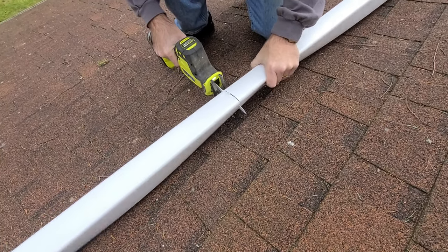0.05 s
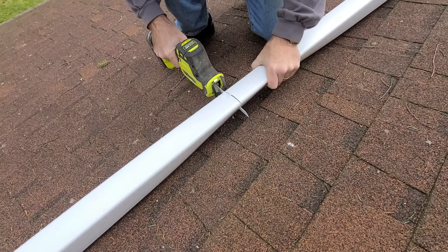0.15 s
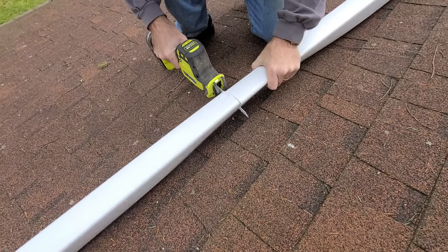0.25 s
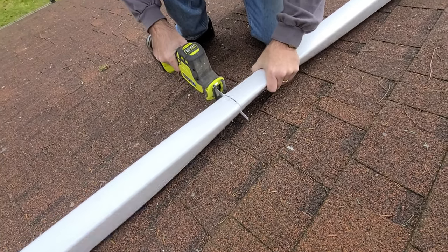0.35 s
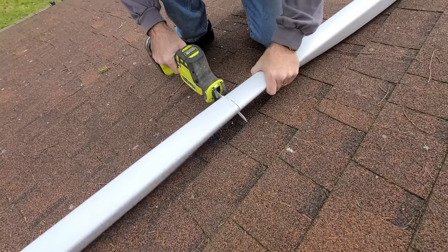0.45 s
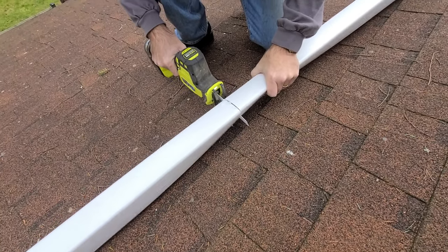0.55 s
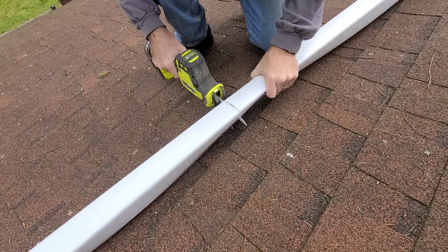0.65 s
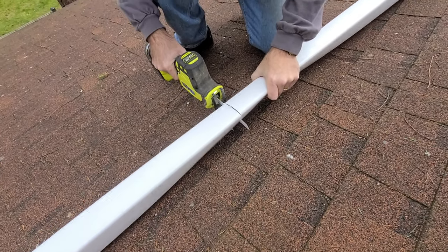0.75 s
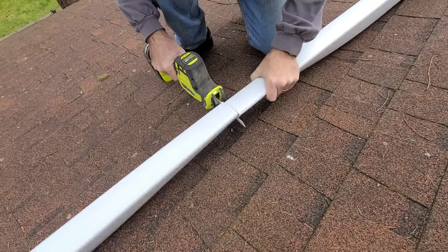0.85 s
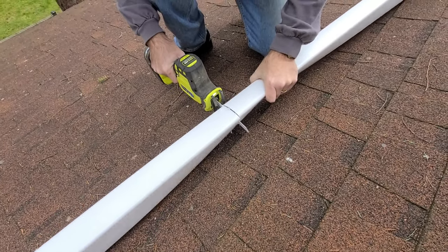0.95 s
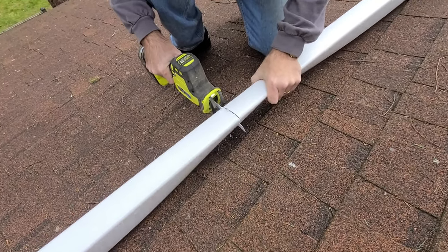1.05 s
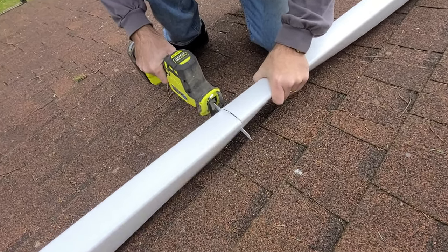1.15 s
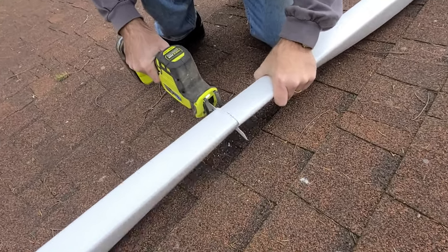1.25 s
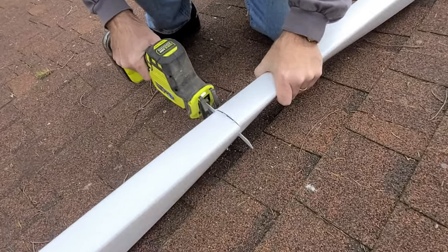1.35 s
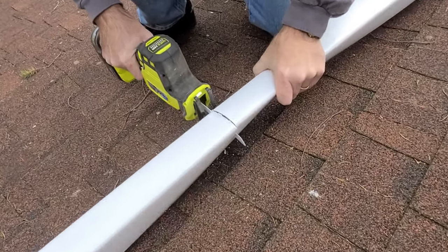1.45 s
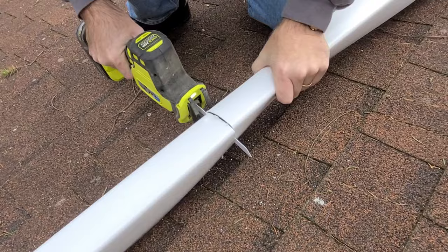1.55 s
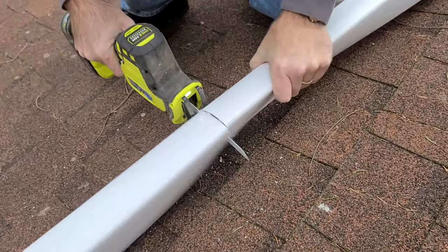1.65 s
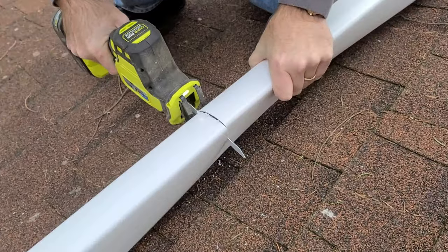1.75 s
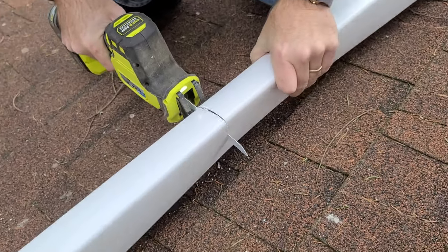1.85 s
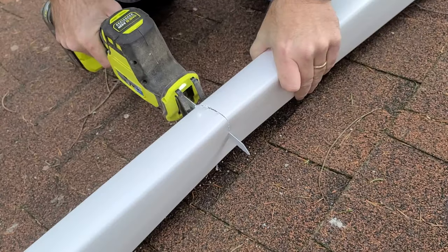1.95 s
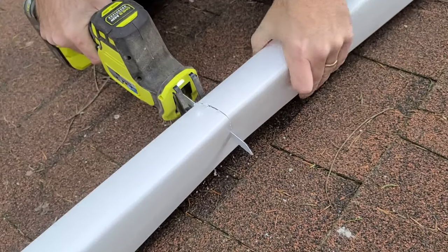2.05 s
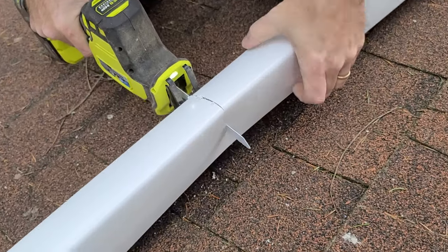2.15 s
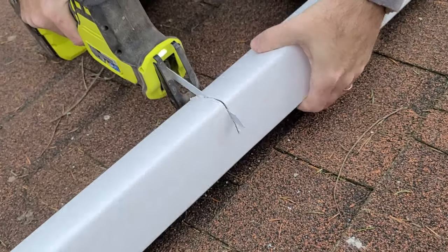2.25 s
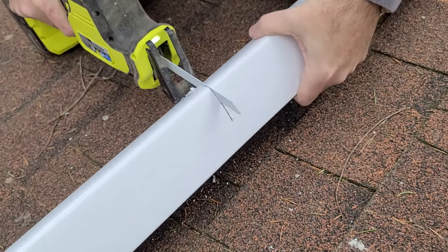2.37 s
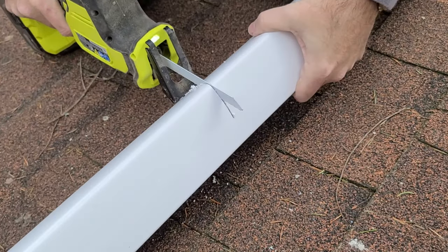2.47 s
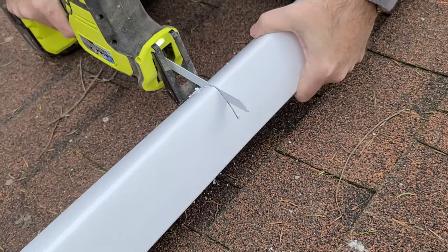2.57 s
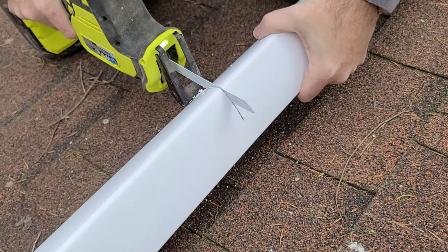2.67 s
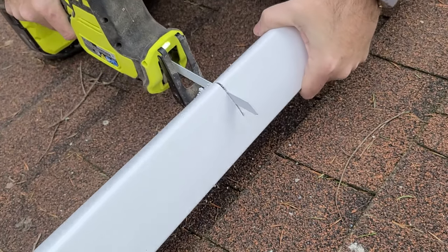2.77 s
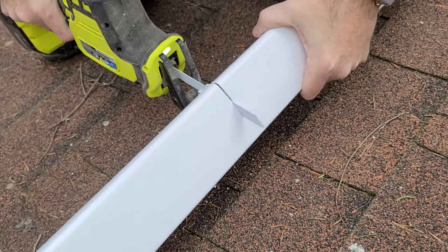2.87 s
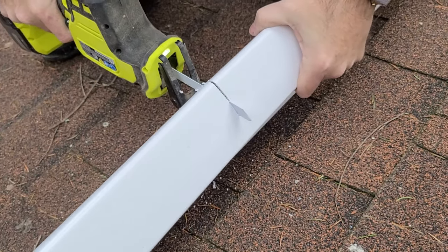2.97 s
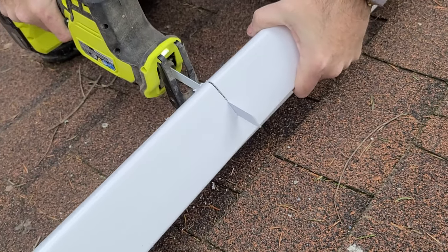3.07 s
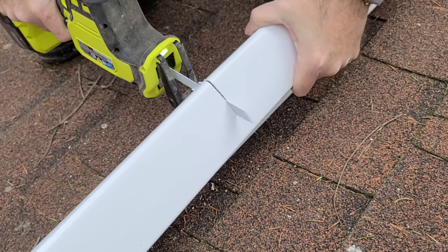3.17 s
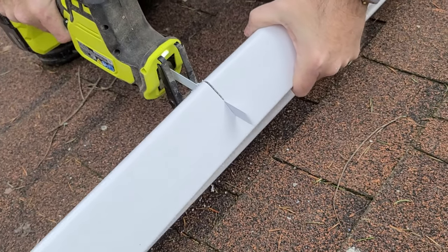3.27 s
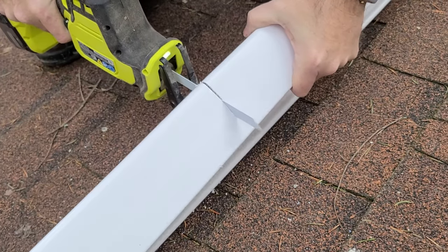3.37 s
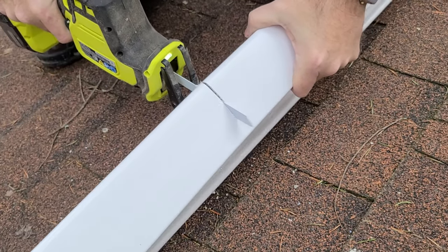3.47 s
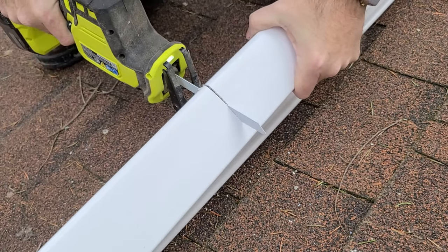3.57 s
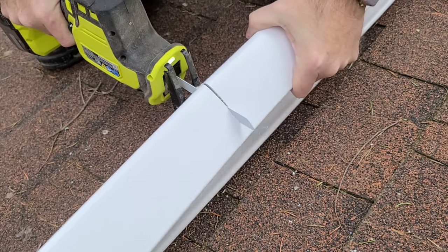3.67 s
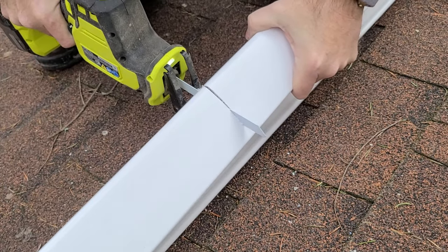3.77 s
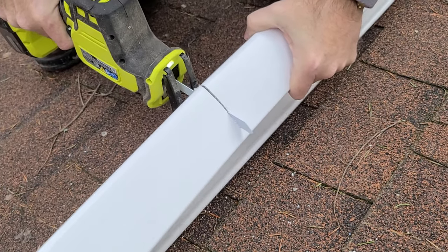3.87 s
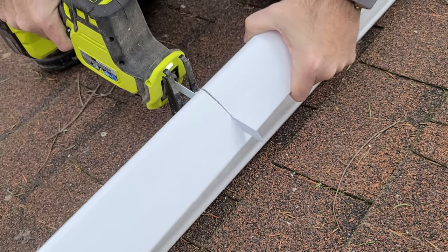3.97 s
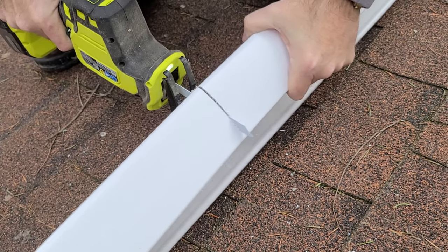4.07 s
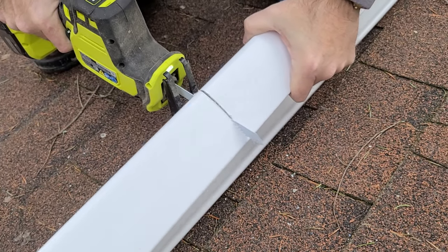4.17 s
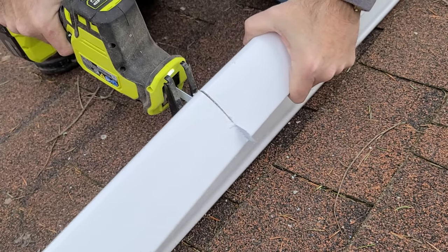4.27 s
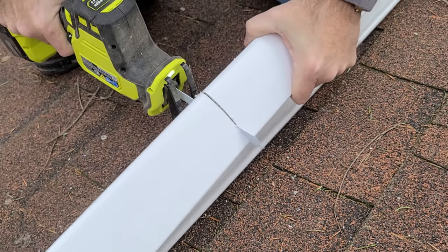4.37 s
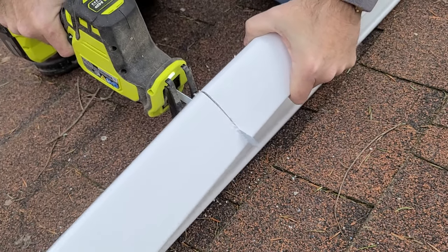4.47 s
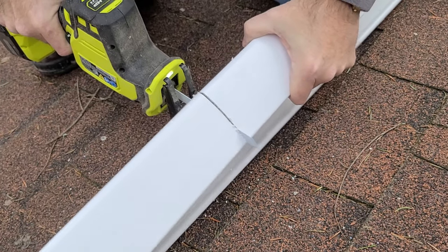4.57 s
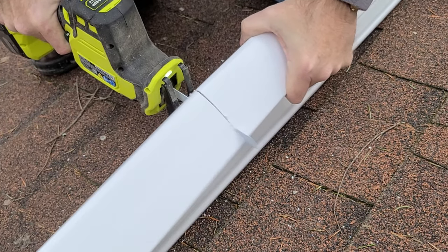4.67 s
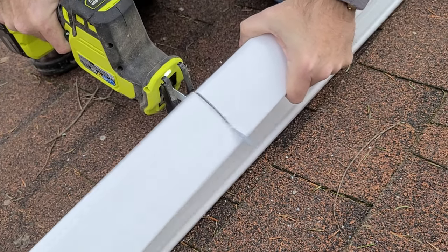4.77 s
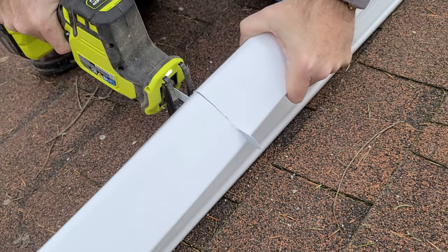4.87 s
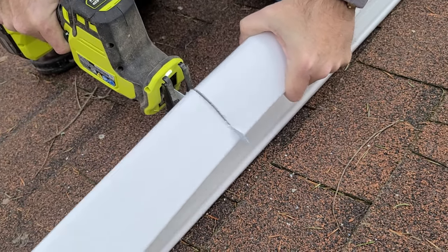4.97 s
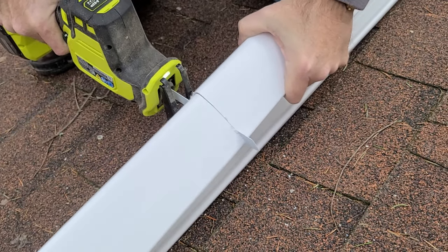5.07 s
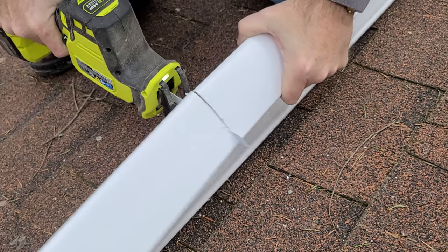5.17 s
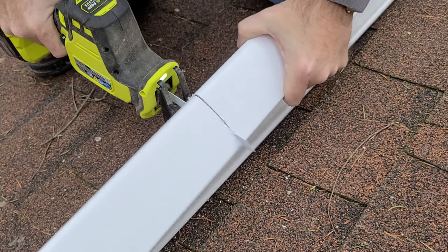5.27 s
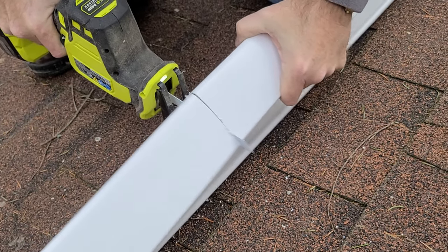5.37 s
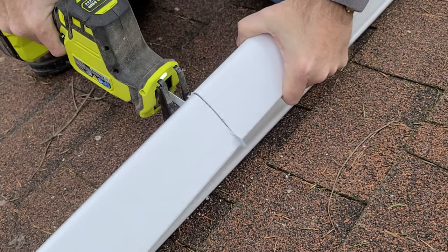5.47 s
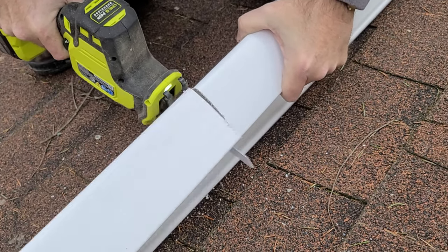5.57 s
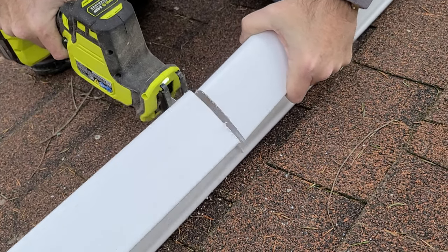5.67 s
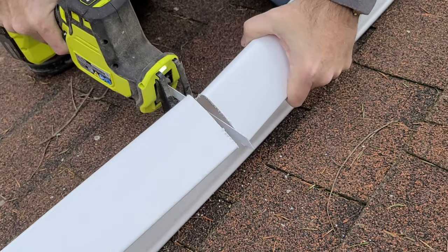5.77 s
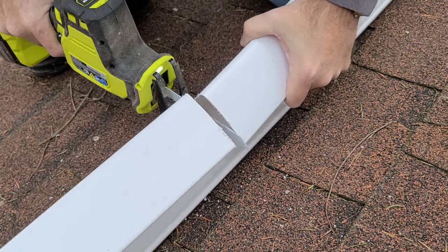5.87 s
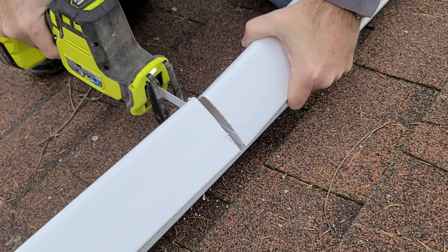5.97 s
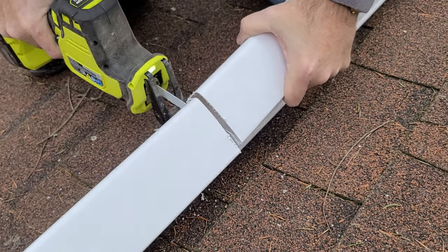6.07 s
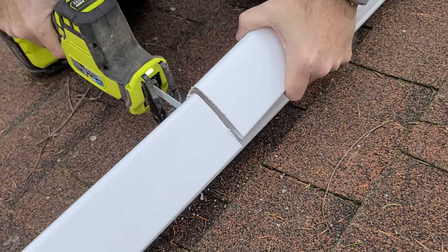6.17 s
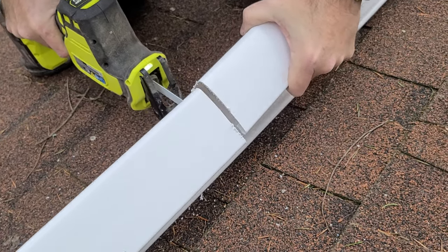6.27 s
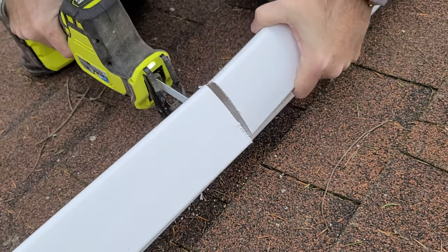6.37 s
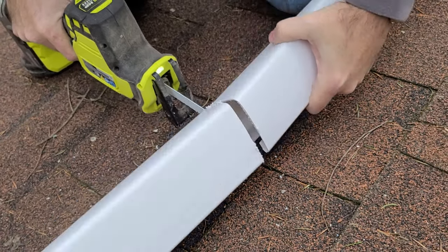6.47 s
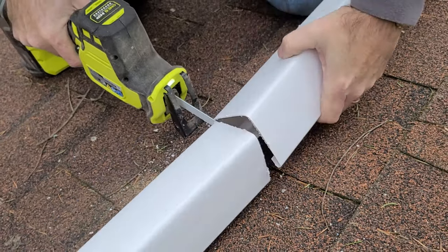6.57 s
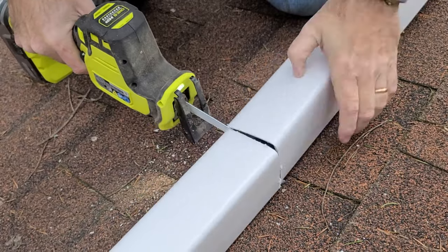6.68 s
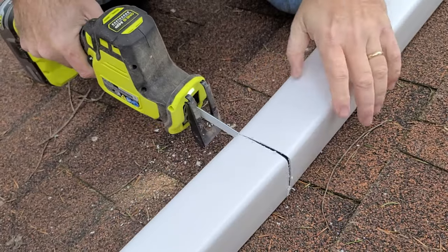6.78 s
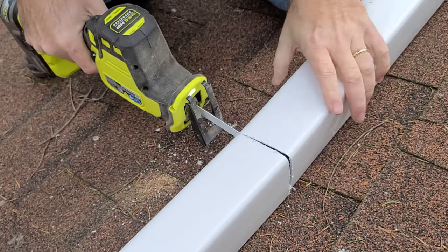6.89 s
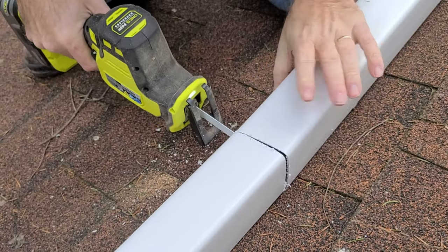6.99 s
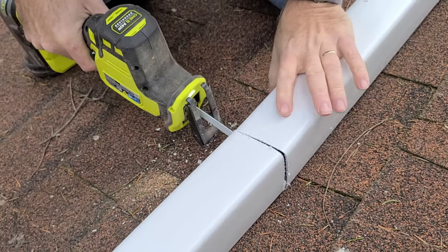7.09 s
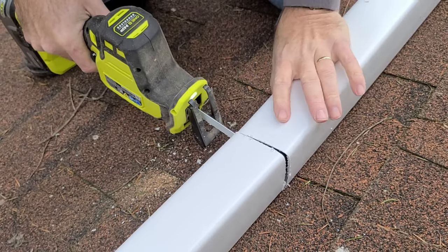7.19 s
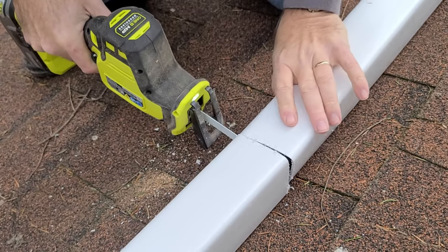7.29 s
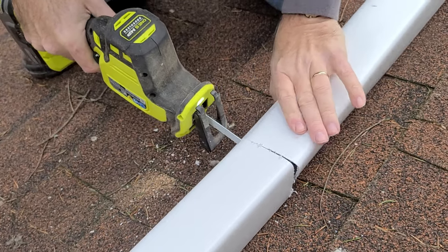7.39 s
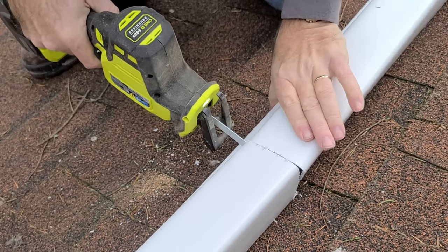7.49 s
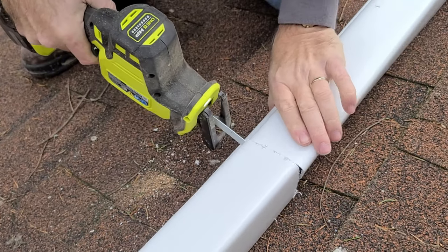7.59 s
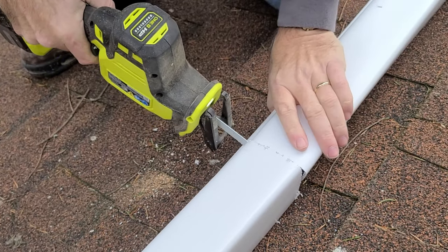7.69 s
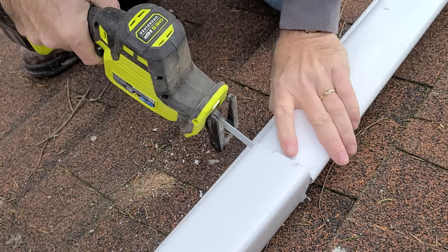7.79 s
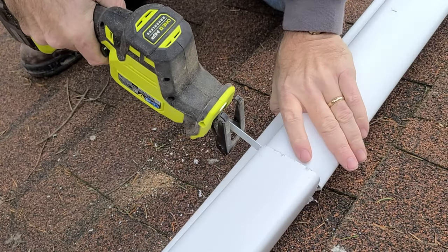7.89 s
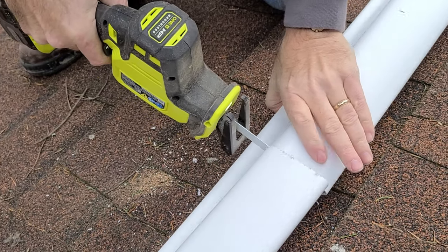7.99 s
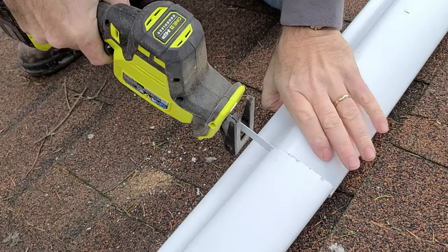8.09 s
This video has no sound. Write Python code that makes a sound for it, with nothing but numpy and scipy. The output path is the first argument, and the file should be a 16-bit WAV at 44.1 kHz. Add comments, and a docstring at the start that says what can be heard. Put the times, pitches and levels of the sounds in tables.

```python
"""A saw buzzes and whirrs in two bursts; between and after them plastic knocks and scrapes on grit.
A cordless reciprocating saw cuts a plastic gutter lying on a shingle roof. At first the gutter chatters
loosely; turned over and held tight it buzzes with the strokes, then gains play again until it parts.
Saw teeth, blows and grit are shaped noise and clicks that ring the modes of the plastic; the shaking
is a stack of wavering sines. Faint outdoor noise lies underneath, and a short echo hollows everything."""
import sys
import numpy as np
from scipy import signal
from scipy.fft import rfft, irfft, next_fast_len
from scipy.io import wavfile
from scipy.ndimage import map_coordinates

SR = 44100
rng = np.random.default_rng(int(sys.argv[2]) if len(sys.argv) > 2 else 0)


def materialize(psi):
    """Save the field psi as 16-bit PCM at rate SR to the path in sys.argv[1].

    A 1-D psi becomes a single channel; in a 2-D psi each row is a channel.
    """
    bounded = np.clip(np.atleast_2d(psi).T, -1, 1)
    quanta = np.round(bounded * 32767).astype(np.int16)
    wavfile.write(sys.argv[1], SR, quanta)


N = 358974

# All table levels are relative: the functions add their own trims.
# Outdoor background spectrum. Each row: frequency in Hz, density in dB per Hz.
AIR_SPECTRUM = [(20, -25), (50, -12), (160, 4), (800, -19.5), (4500, -27), (8000, -96), (15000, -66)]
# Spells of low rumble from wind and handling. Each row: start in seconds, end in seconds, level in dB.
RUMBLE_SPELLS = [(0, 2.55, -57.5), (3.45, 5.75, -52), (6.78, 8.14, -54)]
# The gutter is dragged over the shingles.
# Each row: start in seconds, length in seconds, wall level in dB, grit level in dB.
DRAGS_ON_SHINGLES = [(1.85, .34, -58, -71), (2.045, .035, -57, -61), (2.26, .15, -46.5, -56),
                     (2.62, .04, -59, -60), (5.95, .04, -52, -70), (6.05, .64, -64, -71),
                     (6.73, .17, -38, -47), (6.95, .22, -55, -66), (7.19, .035, -55, -52),
                     (7.31, .1, -50, -57), (7.45, .035, -37, -50), (7.62, .095, -38, -54),
                     (7.8, .025, -39, -56), (7.865, .125, -34, -44.5), (8.12, .02, -52, -58)]
# Grit on plastic. Each row: frequency in Hz, density in dB per Hz.
GRIT_SPECTRUM = [(500, 10.5), (1000, 9.5), (1600, 0), (3000, -0.5), (4600, -7.5), (6800, -28.5),
                 (8500, -21.5), (15000, -42.5)]
# The resting blade clinks. Each row: time in seconds, level in dB.
BLADE_CLINKS = [(2.161, -55), (2.711, -57), (2.745, -66), (2.778, -63), (6.148, -65), (6.39, -60)]
# Ring of the saw's housing. Each row: frequency in Hz, width in Hz, level in dB.
HOUSING_MODES = [(2946, 210, 0)]
# The saw's shoe is set down on the gutter. Each row: time in seconds, peak level in dB.
SHOE_LANDING = [(2.237, -20)]
# What the shoe rings with. Each row: frequency in Hz, width in Hz, level in dB.
SHOE_RING_MODES = [(603, 105, 2), (1083, 50, 1), (1430, 61, -3), (1555, 79, 0), (3650, 110, -11.5)]
# The gutter knocks on the roof and on its other half.
# Each row: time in seconds, wall level in dB, crack level in dB.
GUTTER_KNOCKS = [(1.789, -30, -55), (1.941, -43, -58), (2.811, -27, -58), (2.886, -22, -38),
                 (2.948, -14.5, -35), (3.043, -25, -40), (6.297, -41, -65), (6.592, -36, -44),
                 (6.632, -46, -41.5), (6.716, -27, -45), (6.767, -25, -48), (6.833, -26, -51),
                 (7.028, -33, -51.5), (7.085, -43, -51.5), (7.322, -22, -47), (7.447, -26, -41),
                 (7.464, -20.5, -50), (7.614, -25, -46), (7.658, -31, -47), (7.794, -19, -47),
                 (7.87, -26, -47), (7.932, -23, -50), (7.952, -21, -52)]
# The gutter under the blade. Each row: mode frequency in Hz, width in Hz, level in dB.
GUTTER_MODES = [(348.4, 150, -1.5), (412, 39.5, 9), (511, 69, 3), (649.5, 36.3, 7), (782, 128, -3),
                (939, 78, -4.5)]
# The gutter lying free on the roof. Each row: mode frequency in Hz, width in Hz, level in dB.
PIECE_MODES = [(170, 36, -12), (241, 31.5, 2.5), (338, 68, 4), (422, 42, 8), (573, 85, -1), (780, 206, -3)]
# Bursts of the saw. Each row: trigger pulled in seconds, released in seconds, strokes per second,
# gear level in dB.
TRIGGER_PULLS = [(-1.0, 1.73, 44.5, -45.4), (2.78, 5.89, 45.0, -41.9)]
# The blade cuts through one face of the gutter.
# Each row: start in seconds, end in seconds, buzz level in dB, wall level in dB, rasp level in dB.
FACE_CUTS = [(-0.1, 1.77, -42, -33.1, -45), (2.93, 4.5, -36.8, -36.6, -41),
             (4.58, 5.57, -35.3, -38.5, -43.6), (5.73, 5.78, -36.5, -39, -43)]
# The teeth snag in a corner of the profile. Each row: time in seconds, rasp level in dB.
CORNER_SNAGS = [(3.58, -42), (4.42, -34)]
# Play of the gutter under the blade. Each row: time in seconds, looseness from 0 to 1.
GUTTER_PLAY = [(1.8, 0.96), (2.95, 1), (3.3, 0), (5.5, 0.84), (5.8, 0.55)]
# Shaking at 1, 2, 3 .. times the stroke rate. Each entry: level in dB.
BUZZ_LEVELS = [-41, -5.5, -13, -7.5, -12.5, -7.5, 1.5, -5.5, -4, -9.5, -19.5, -16, 0.5]
# Teeth in the plastic. Each row: frequency in Hz, density in dB per Hz.
RASP_SPECTRUM = [(400, -39.5), (750, 14), (1050, 4.5), (1400, 1), (2400, -11.5), (4500, -24.5), (7000, -31),
                 (14000, -90.5)]
# Motor and gears. Each row: frequency in Hz, density in dB per Hz.
GEAR_SPECTRUM = [(1200, -2.5), (2300, -5.5), (3200, 0.5), (5000, -4.5), (6900, -18.5), (8700, -13),
                 (10200, -15.5), (11500, -21), (13300, -38), (15000, -43)]
# Stereo width. Each row: frequency in Hz, added side level in dB.
SIDE_WIDTH = [(60, -2.5), (130, -16), (280, -11), (550, -18.5), (1100, -15.5), (1700, 2.5), (4000, -5),
              (12000, 1.5)]
# Stereo lean. Each row: frequency in Hz, added left-minus-right level in dB.
LEFT_LEAN = [(900, -0.5), (1500, -2), (3300, -1), (7500, 5), (10500, 9.5), (13000, 11)]

SPIN_UP_S, BRAKE_S = .23, .16
GEAR_POWER, HISS_POWER = 1.2, 2.6   # gear noise grows with the speed, its hiss more steeply still
CREEP_PER_S2, GEAR_EASE_DB_PER_S = .25, .7   # as the load eases the strokes quicken and the gears quieten
SEATING_S = 1.0   # the shoe settles on the gutter and passes on more and more of the shaking
ENTER_S, LEAVE_T60_S = .09, .4
WALL_EASE_DB_PER_S, RASP_EASE_DB_PER_S = .9, .6
CORNER_S = .06   # rasp falls to 1/e this far either side of a snag
PARTED_S = 6   # the gutter is in two pieces from here on
DRAG_ATTACK_S, DRAG_WALL_T60_S, DRAG_GRIT_T60_S = .025, .3, .22
ECHO_S, CUTOFF_HZ = .003767, 15400
TIME = np.arange(N) / SR


def from_db(db):
    """Decibels to gain."""
    return 10 ** (np.asarray(db) / 20)


def rms_one(x):
    """Scale to rms 1."""
    return x / np.sqrt(np.mean(x ** 2) + 1e-20)


def rfft_hz(size):
    """Frequencies of the bins of a real FFT."""
    return np.arange(size // 2 + 1) * SR / size


def drift(rate):
    """Slow chance of spread 1, with about `rate` turns a second."""
    return rms_one(np.interp(TIME * rate, np.arange(8000), rng.standard_normal(8000)))


def noise():
    """Two unrelated white noises; they serve as a (mid, side) pair."""
    return rng.standard_normal((2, N))


def grains(per_s, spread_db):
    """Random clicks of uneven size, rms 1."""
    sizes = from_db(spread_db * np.minimum(rng.exponential(1, N), 4))
    return rms_one(noise() * sizes * (rng.random(N) < per_s / SR))


def coloured(x, spectrum, size=4096):
    """Causal (minimum-phase) filter with the given spectrum."""
    hz, db = np.transpose(spectrum)
    grid = np.maximum(rfft_hz(size), 1)
    gain = from_db(np.interp(np.log(grid), np.log(hz), db))
    cepstrum = irfft(np.log(gain))
    # folding the cepstrum forward puts the whole response after the click
    cepstrum[1:size // 2] *= 2
    cepstrum[size // 2 + 1:] = 0
    response = irfft(np.exp(rfft(cepstrum)))
    return signal.oaconvolve(x, response[None], axes=1)[:, :N]


def ring(force, modes, size=4096):
    """A body rings in a few damped modes; white force keeps its rms."""
    click, response = signal.unit_impulse(size), 0
    for k, (hz, width, db) in enumerate(modes):
        r = np.exp(-np.pi * width / SR)
        mode = signal.lfilter([1, 0, -1], [1, -2 * r * np.cos(2 * np.pi * hz / SR), r * r], click)
        # neighbouring modes alternate in sign
        response = response + (-1) ** k * from_db(db) * (1 - r * r) * mode
    band_hz = [modes[0][0] / 2, modes[-1][0] * 2]
    response = signal.sosfilt(signal.butter(2, band_hz, "band", fs=SR, output="sos"), response)
    return signal.oaconvolve(force, response[None] / np.linalg.norm(response), axes=1)[:, :N]


def crunch(force):
    """Grit on plastic; white force keeps its rms."""
    click = signal.unit_impulse((1, SR))
    return coloured(force, GRIT_SPECTRUM) / np.linalg.norm(coloured(click, GRIT_SPECTRUM))


def contact(s, rise_s, t60):
    """Force of one touch: a quick rise, then a decay."""
    age = np.maximum(TIME - s + rise_s / 2, 0)
    return np.minimum(age / rise_s, 1) ** 2 * np.exp(-np.log(1000) * np.minimum(age / t60, 2))


def ramp(s, length_s):
    """A straight rise from 0 to 1 that begins at s."""
    return np.clip((TIME - s) / length_s, 0, 1)


def held(start, end, attack_s, t60):
    """Envelope of a lasting contact: attack, hold, release."""
    release = np.exp(-np.log(1000) * np.clip((TIME - end) / t60, 0, 3))
    return ramp(start - attack_s / 2, attack_s) * release


def outdoors(air_db=-76.5, rumble_hz=(44, 100), calm_db=-68.0, swell_s=.12, fade_t60=.6):
    """Faint distant noise, and a low rumble that swells in spells over a calm floor."""
    rumble = signal.sosfilt(signal.butter(2, rumble_hz, "band", fs=SR, output="sos"), noise())
    level = from_db(calm_db)
    for start, end, db in RUMBLE_SPELLS:
        level = level + from_db(db) * held(start, end, swell_s, fade_t60)
    air = rms_one(coloured(noise(), AIR_SPECTRUM))
    return from_db(air_db) * air + level * rms_one(rumble)


def drags(slip_db=2.6):
    """Shingle grit catches and slips under the plastic; the crunch stops sooner than the drone of the walls."""
    wall = grit = 0
    for s, length, wall_db, grit_db in DRAGS_ON_SHINGLES:
        wall = wall + from_db(wall_db) * held(s, s + length, DRAG_ATTACK_S, DRAG_WALL_T60_S)
        grit = grit + from_db(grit_db) * held(s, s + length, DRAG_ATTACK_S, DRAG_GRIT_T60_S)
    force = grains(4000, 2.15) * rms_one(from_db(slip_db * drift(80)))
    return wall * ring(force, PIECE_MODES) + grit * crunch(force)


def clinks(rise_s=.006, t60=.09, grit_db=-3.0):
    """The resting blade shifts in the kerf and makes the saw's housing ring."""
    touches = sum(from_db(db) * contact(s, rise_s, t60) for s, db in BLADE_CLINKS)
    force = touches * noise()
    return ring(force, HOUSING_MODES) + from_db(grit_db) * crunch(force)


def shoe(ring_db=1.5, crack_db=-16.0, crack_t60=0.09):
    """The steel shoe clacks on the plastic: one blow rings its modes, with a crack of grit."""
    (s, peak_db), = SHOE_LANDING
    blow = signal.unit_impulse(N, int(s * SR)) * rng.choice([-1, 1], (2, 1))
    clack = ring(blow, SHOE_RING_MODES)
    crack = crunch(contact(s, 0.0052, crack_t60) * noise())
    return from_db(peak_db) * (from_db(ring_db) * clack / np.abs(clack).max() + from_db(crack_db) * crack)


def knocks(wall_db=-1.3, crack_db=4.5, panel_db=3.5, panel_hz=(1000, 3400), panel_width_hz=320,
           contact_t60=0.062, crack_t60=0.11, rise_s=0.0095, blow_db=14.0):
    """Each knock is a blow with a crunch of grit; each spot rings a few panel modes of its own."""
    push, crack, blows = np.zeros((3, N))
    panels = np.zeros((2, N))
    force = grains(7000, 4.5)
    for s, low_db, high_db in GUTTER_KNOCKS:
        push += from_db(low_db) * contact(s, rise_s, contact_t60)
        blows[int(s * SR)] = from_db(low_db + blow_db)
        touch = from_db(high_db) * contact(s, rise_s, crack_t60)
        crack += touch
        near = slice(int((s - rise_s) * SR), int(s * SR) + SR // 8)
        modes = [(hz, panel_width_hz, 0) for hz in np.sort(rng.uniform(*panel_hz, size=7))]
        panels[:, near] += ring(touch[near] * force[:, near], modes)[:, :len(touch[near])]
    thrust = from_db(wall_db) * (blows + push * force)
    whole = TIME < PARTED_S
    body = ring(thrust * whole, GUTTER_MODES) + ring(thrust * ~whole, PIECE_MODES)
    return body + from_db(crack_db) * crunch(crack * force) + from_db(panel_db) * panels


def motor():
    """The motor spins up with the trigger and brakes on release: strokes per s, gear gain, shoe seating 0-1."""
    speed = gear = seated = 0
    for pulled, released, per_s, db in TRIGGER_PULLS:
        spin = ramp(pulled, SPIN_UP_S) * (1 - ramp(released, BRAKE_S))
        since_pull = TIME - pulled
        speed = speed + (per_s + CREEP_PER_S2 * since_pull) * spin
        gear = gear + from_db(db - GEAR_EASE_DB_PER_S * since_pull) * spin ** GEAR_POWER
        seated = seated + ramp(pulled, SEATING_S) * spin
    return speed, gear, seated


def cutting():
    """Gains of buzz, wall and rasp: each face cuts more easily as it goes; corners rasp louder."""
    shake = wall = rasp = 0
    for start, end, buzz_db, wall_db, rasp_db in FACE_CUTS:
        engaged = held(start, end, ENTER_S, LEAVE_T60_S)
        from_middle_s = np.clip(TIME, start, end) - (start + end) / 2
        shake = shake + engaged * from_db(buzz_db)
        wall = wall + engaged * from_db(wall_db - WALL_EASE_DB_PER_S * from_middle_s)
        rasp = rasp + engaged * from_db(rasp_db - RASP_EASE_DB_PER_S * from_middle_s)
    for s, db in CORNER_SNAGS:
        rasp = rasp + from_db(db) * np.exp(-np.abs(TIME - s) / CORNER_S)
    return shake, wall, rasp


def pressure(stroke, loose, pull_db=3.0, bounce_db=1.0, uneven_db=1.5):
    """The blade bites on the pull; a loose gutter bounces, so that strong and weak strokes alternate."""
    pull = pull_db * np.cos(2 * np.pi * stroke)
    bounce = bounce_db * np.cos(np.pi * stroke)
    return rms_one(from_db(loose * (pull + bounce + uneven_db * drift(90))))


def teeth(stroke, loose, count=14):
    """Teeth catch one by one as the blade swings; the firmer the wall, the more alike the strokes."""
    half = np.floor(2 * stroke)
    travel = half + (1 - np.cos(np.pi * (2 * stroke - half))) / 2
    tooth = (travel * count).astype(int)
    own_bite = rng.standard_normal((2, 2 * count))[:, tooth % (2 * count)]
    chance = np.clip(0.62 + 0.44 * loose, 0, 1)
    bites = np.sqrt(1 - chance) * own_bite + np.sqrt(chance) * noise()
    return rms_one((np.diff(tooth, prepend=0) > 0) * bites)


def buzz(stroke, loose, waver_db=3.4, smear=1.0):
    """The swinging blade carrier shakes saw and gutter; play smears the upper multiples."""
    out = 0
    for order, db in enumerate(BUZZ_LEVELS, 1):
        phase = 2 * np.pi * (order * stroke + rng.random((2, 1)))
        phase = phase + smear * loose * 2 * order / len(BUZZ_LEVELS) * drift(40)
        out = out + from_db(db + waver_db * drift(14)) * np.sin(phase)
    return rms_one(out)


def rattle(stroke, speed, loose, burst_t60=.035, uneven_db=7.0):
    """Where the gutter has play, the blade rattles in the kerf in one short burst a stroke."""
    sizes = from_db(uneven_db * np.clip(rng.standard_normal(N), -2, 2))[stroke.astype(int)]
    age = stroke % 1 / np.maximum(speed, 1)   # seconds since the stroke began
    burst = (speed > 0) * np.minimum(age * 1000, 1) * np.exp(-np.log(1000) * age / burst_t60)
    return loose ** 2 * crunch(rms_one(sizes * burst * noise()))


def saw(wall_db=-4.6, chips=.45, clatter_db=0.9, slap=0.73, housing_db=-11.0, rattle_db=-2.0):
    """Teeth drive the gutter walls and rasp in the kerf; the gears whirr and clatter at each reversal."""
    speed, gear, seated = motor()
    pace = speed / speed.max()
    loose = np.interp(TIME, *np.transpose(GUTTER_PLAY))
    stroke = np.cumsum(speed) / SR   # strokes made so far
    shake, wall, rasp = cutting()
    bite = pressure(stroke, loose * pace)
    # a loose gutter slaps the shoe once a stroke, harder on every second one
    new_stroke = np.diff(np.floor(stroke), prepend=0)
    slaps = slap * loose * rms_one(new_stroke * bite ** 2 * np.sign(noise()))
    force = bite * rms_one(teeth(stroke, loose) + chips * grains(2500, 4.7))
    # the hiss goes with speed; a coasting saw leaves the ring of its housing
    whirr = pace ** HISS_POWER * rms_one(coloured(grains(9000, 0.67) + 0.35 * force, GEAR_SPECTRUM))
    housing = from_db(housing_db) * ring(noise(), HOUSING_MODES)
    clatter = rms_one(bite ** 0.49 * from_db(clatter_db * np.cos(4 * np.pi * stroke)))
    return (seated * shake * buzz(stroke, loose)
            + from_db(wall_db) * wall * ring(force + slaps, GUTTER_MODES)
            + rasp * rms_one(coloured(force, RASP_SPECTRUM))
            + from_db(rattle_db) * gear * pace * rattle(stroke, speed, loose)
            + gear * (whirr + housing) * clatter)


def scene():
    """Layers every source; the body of the sound is central, the treble is wide and leans left."""
    mid, side = outdoors() + drags() + clinks() + shoe() + knocks() + saw()
    pair = mid + coloured(side[None], SIDE_WIDTH) * [[1], [-1]]
    size = next_fast_len(N, True)
    lean_db = np.interp(rfft_hz(size), *np.transpose(LEFT_LEAN))
    return irfft(rfft(pair, size) * from_db([lean_db / 2, -lean_db / 2]), size)[:, :N]


def record(dry, echo_db=-7.0, trim_db=1.49):
    """One short fixed echo gives everything a hollow colour; the top is cut."""
    # cubic interpolation places the echo between samples
    places = np.meshgrid([0, 1], np.arange(N) - ECHO_S * SR, indexing="ij")
    echo = map_coordinates(dry, places, order=3)
    hollow = from_db(trim_db) * (dry + from_db(echo_db) * echo)
    return signal.sosfilt(signal.ellip(10, .1, 80, CUTOFF_HZ, fs=SR, output="sos"), hollow)


dry = scene()
out = record(dry)
materialize(out)
```